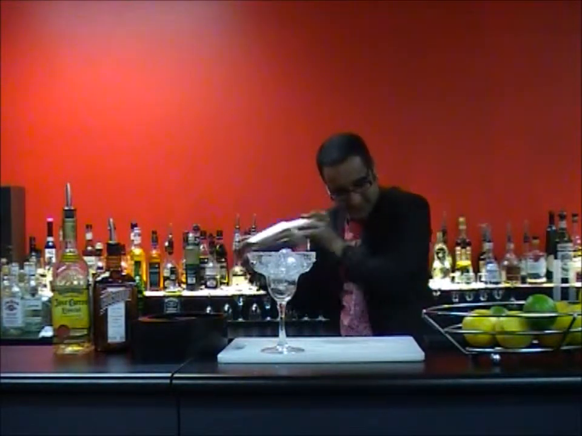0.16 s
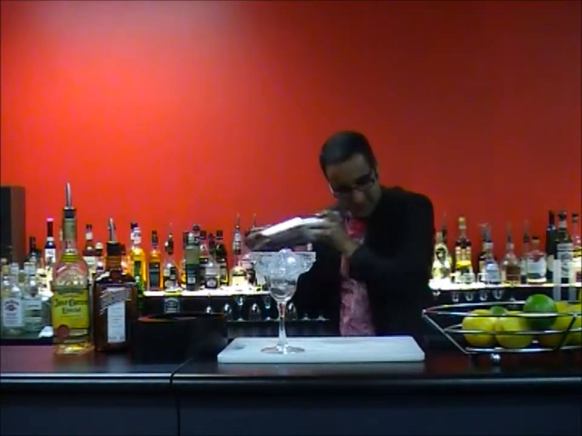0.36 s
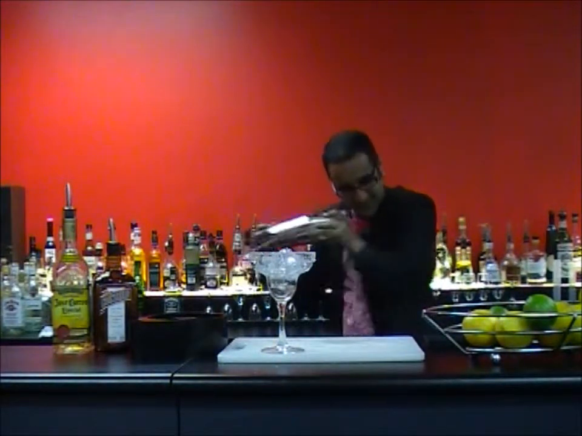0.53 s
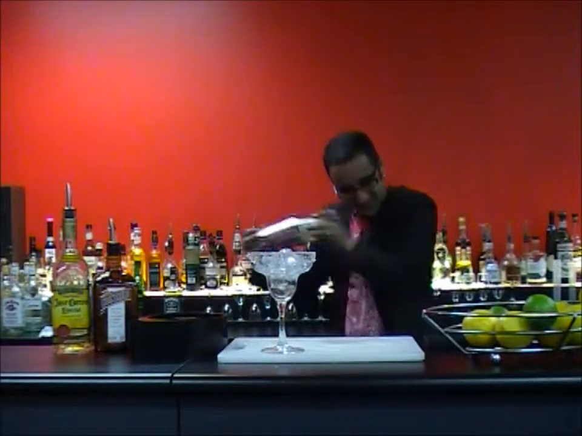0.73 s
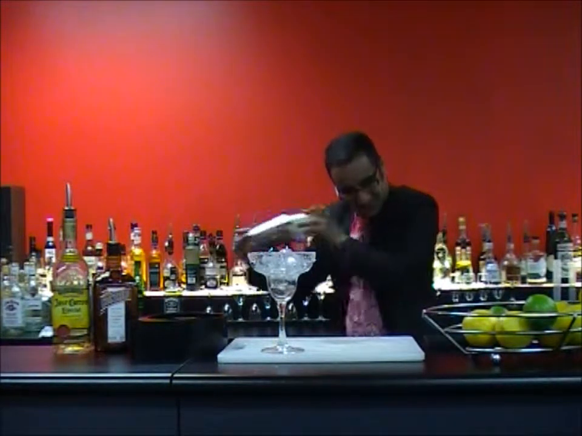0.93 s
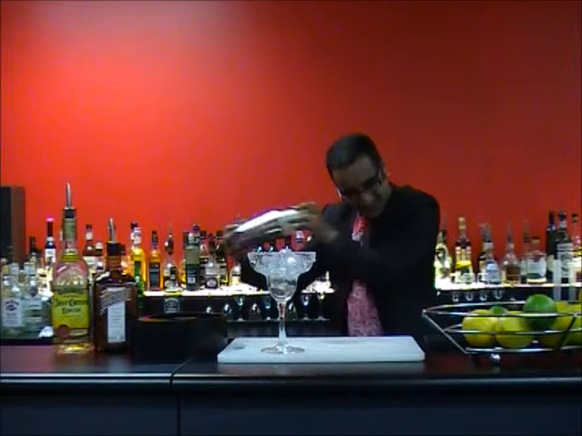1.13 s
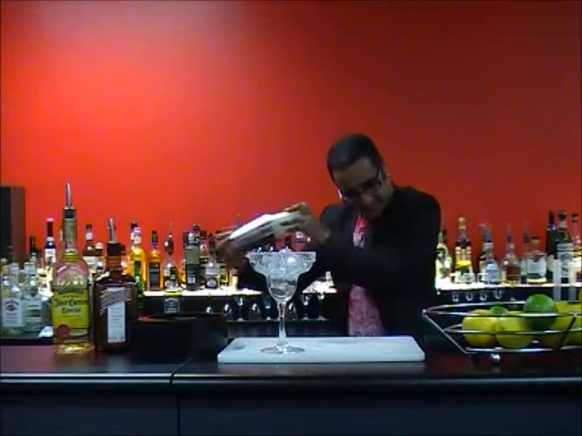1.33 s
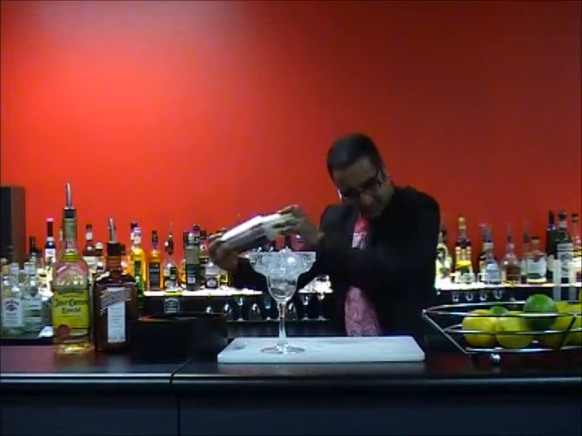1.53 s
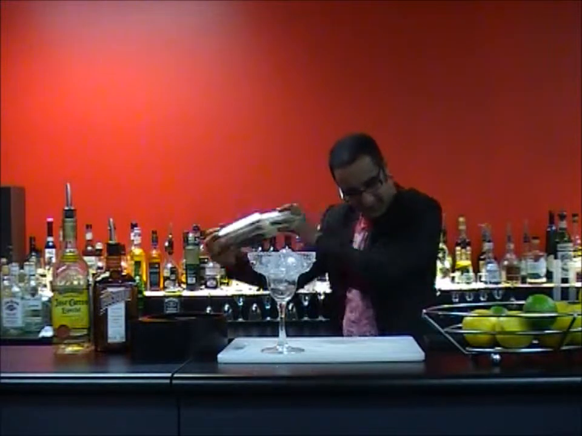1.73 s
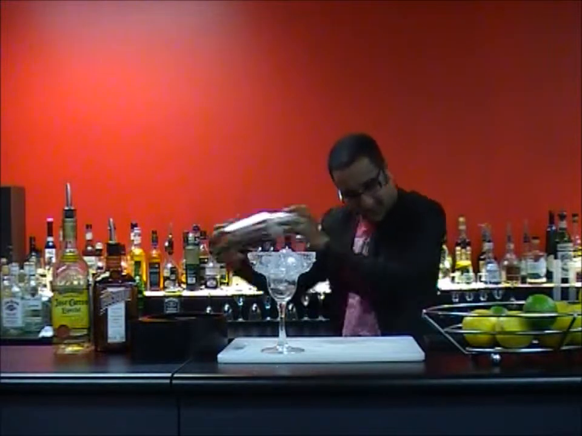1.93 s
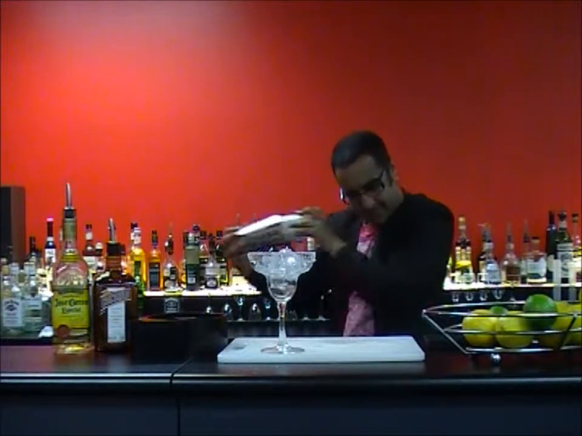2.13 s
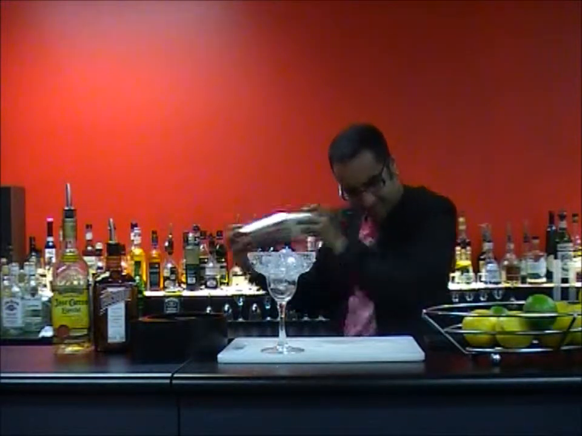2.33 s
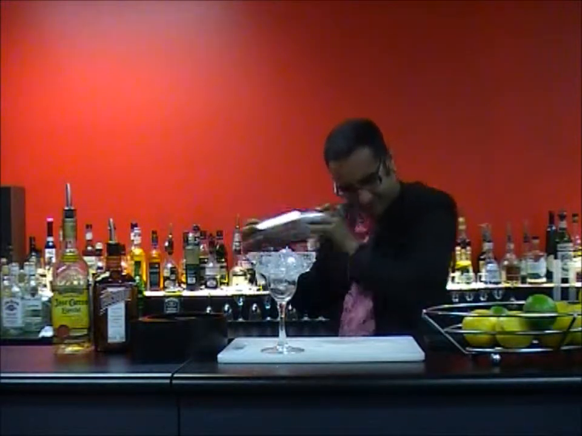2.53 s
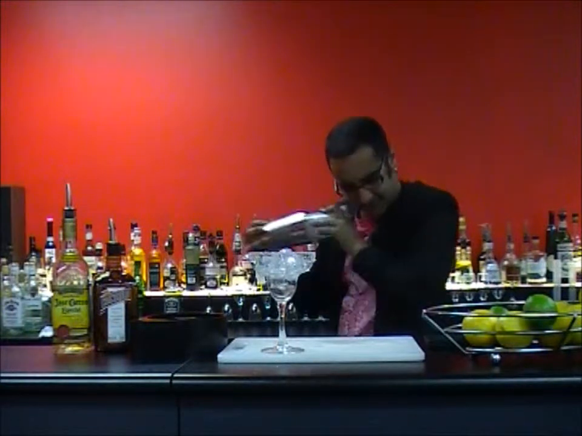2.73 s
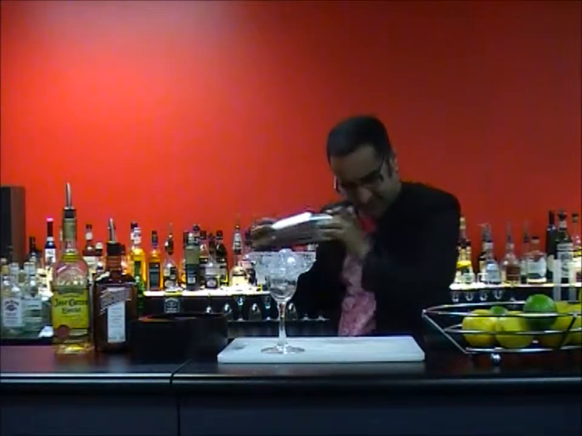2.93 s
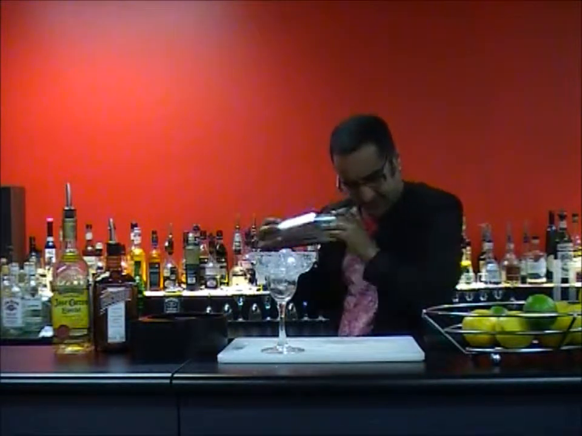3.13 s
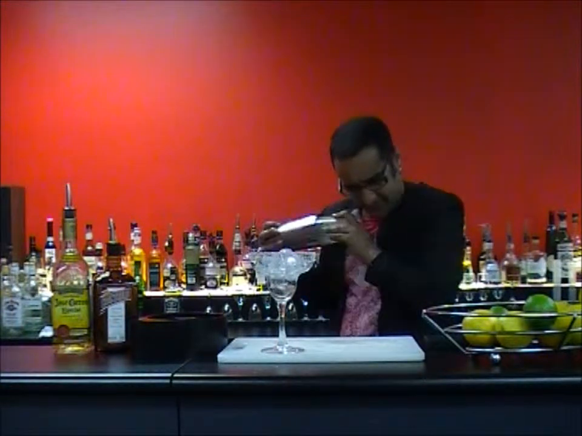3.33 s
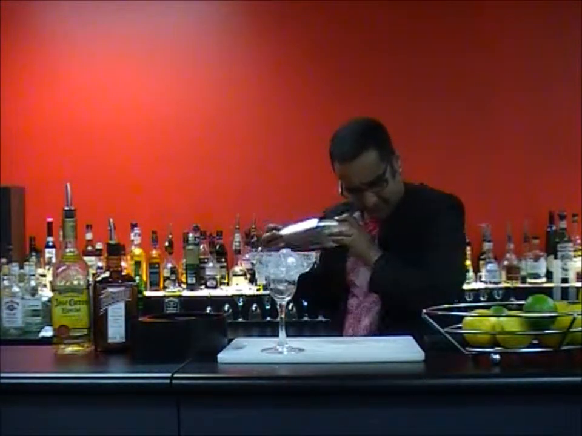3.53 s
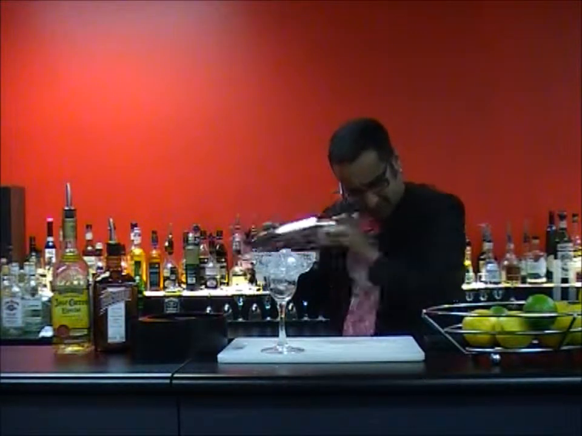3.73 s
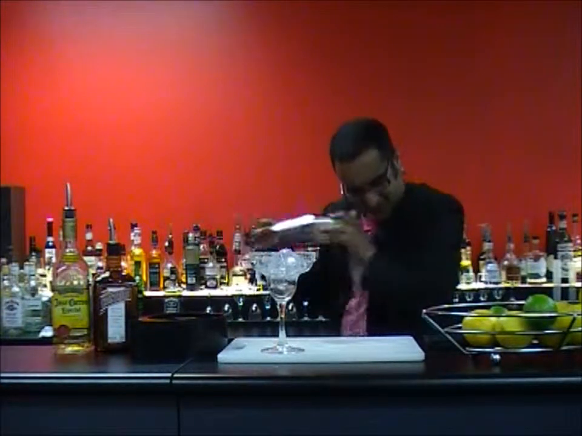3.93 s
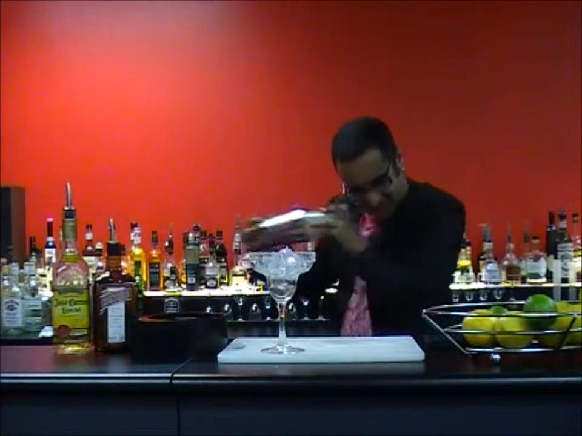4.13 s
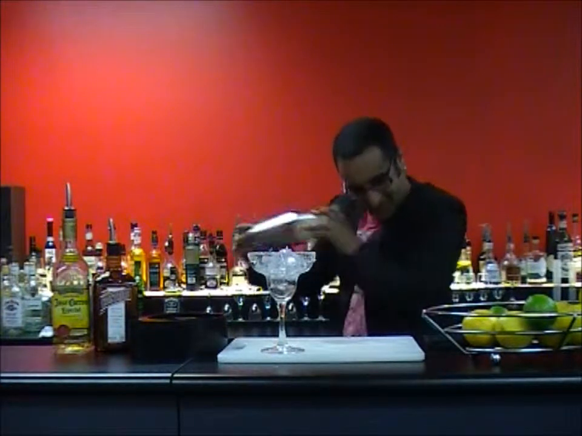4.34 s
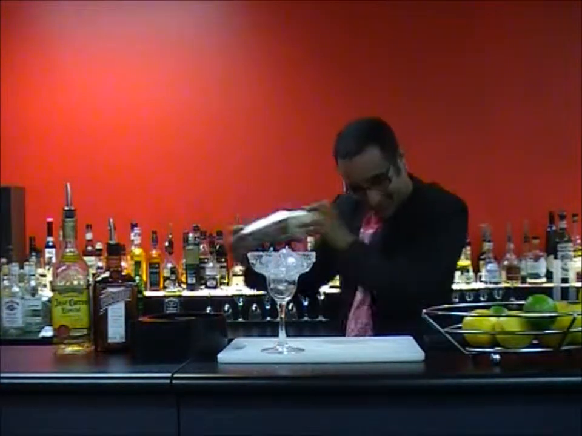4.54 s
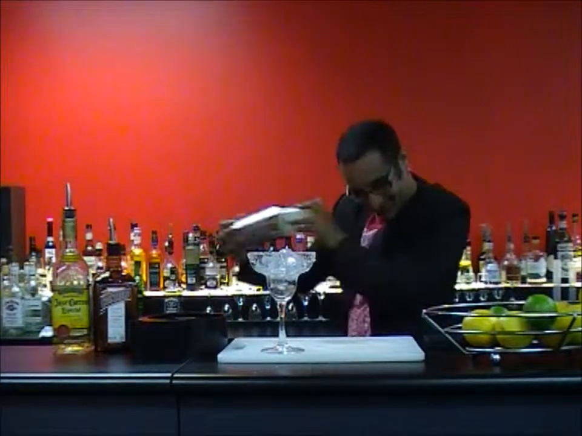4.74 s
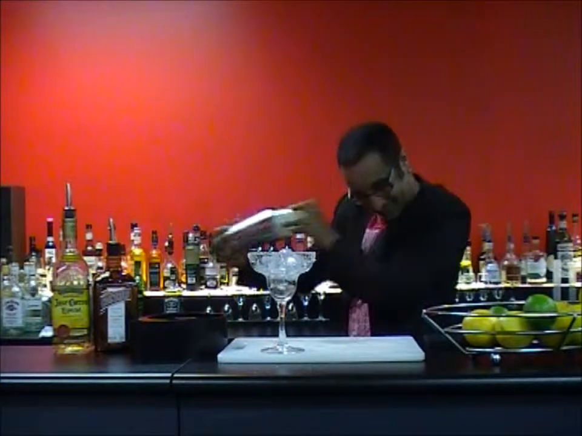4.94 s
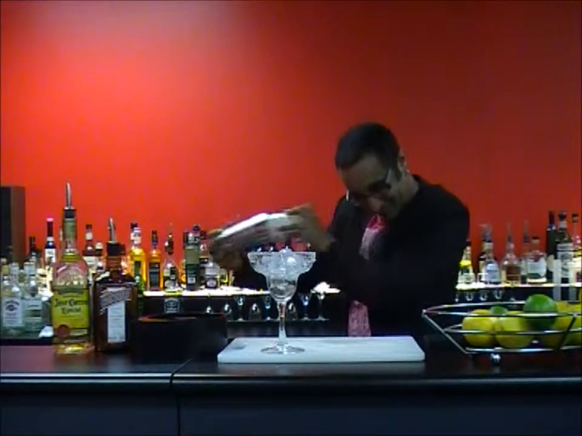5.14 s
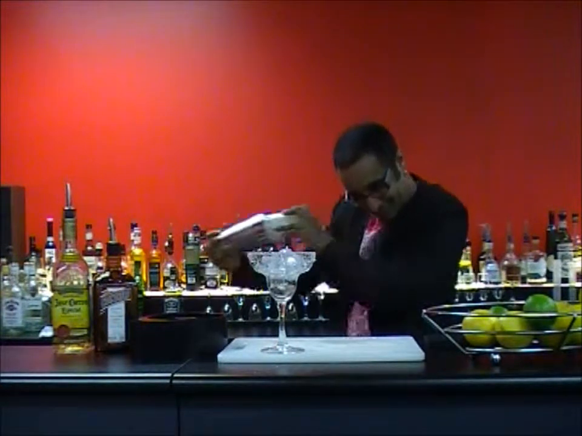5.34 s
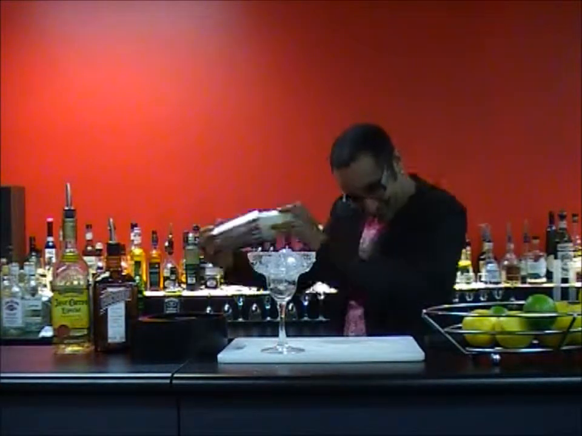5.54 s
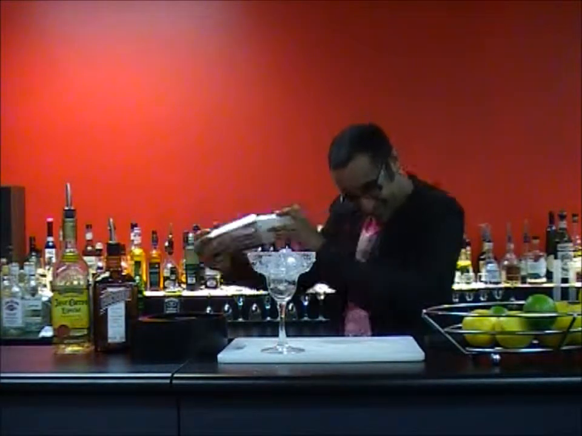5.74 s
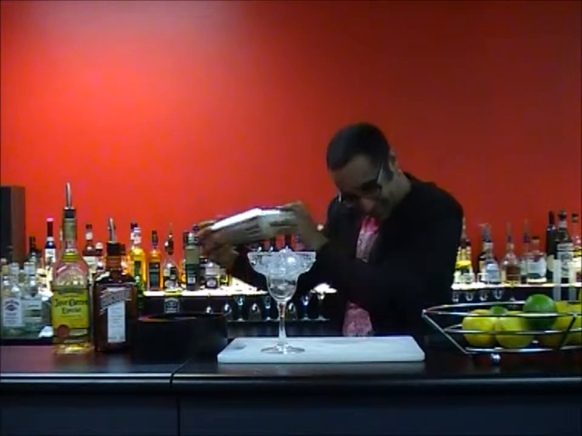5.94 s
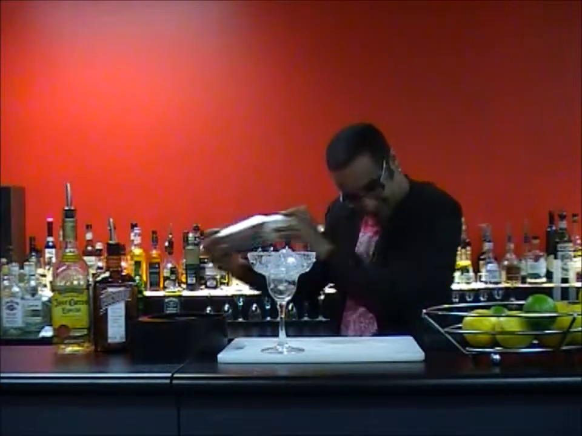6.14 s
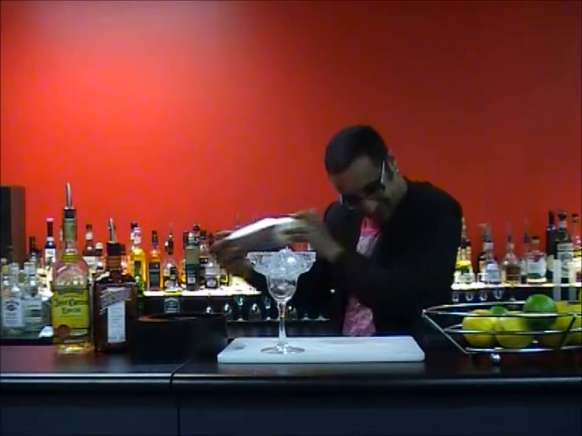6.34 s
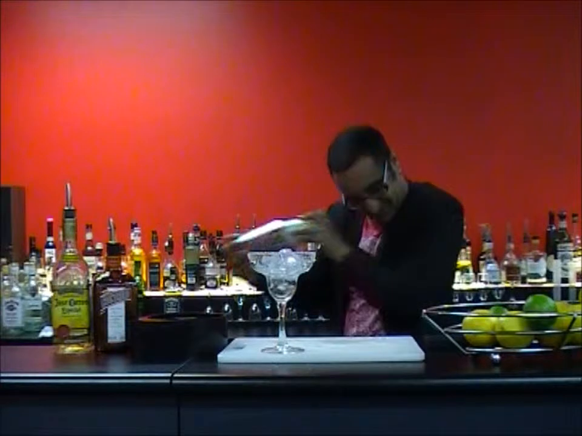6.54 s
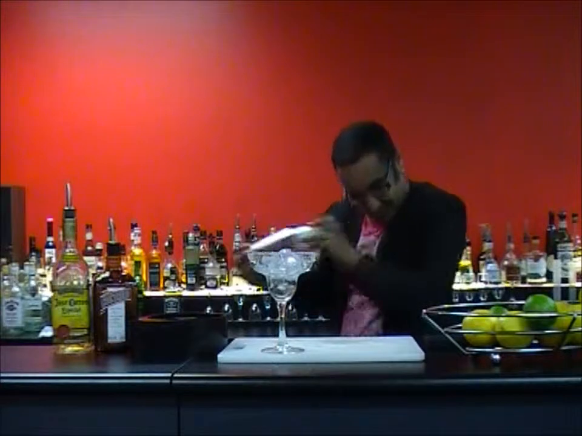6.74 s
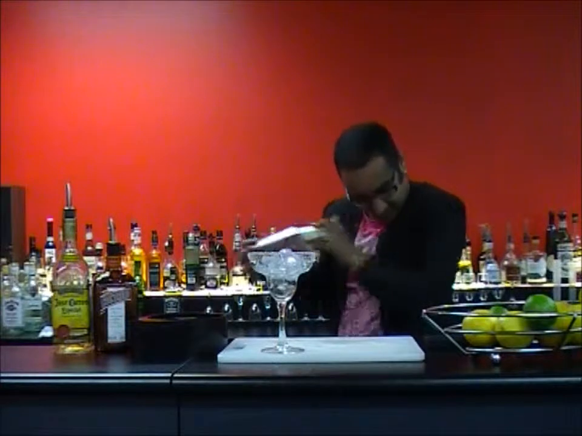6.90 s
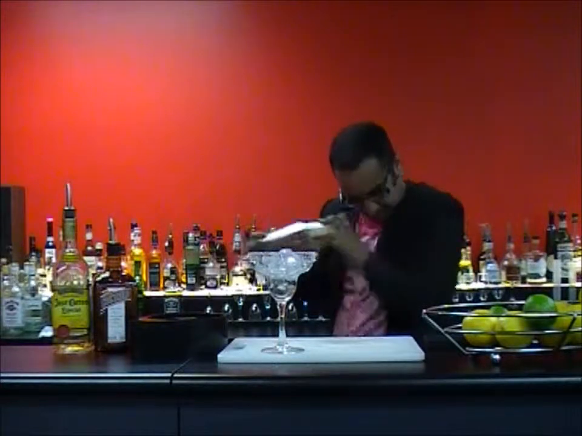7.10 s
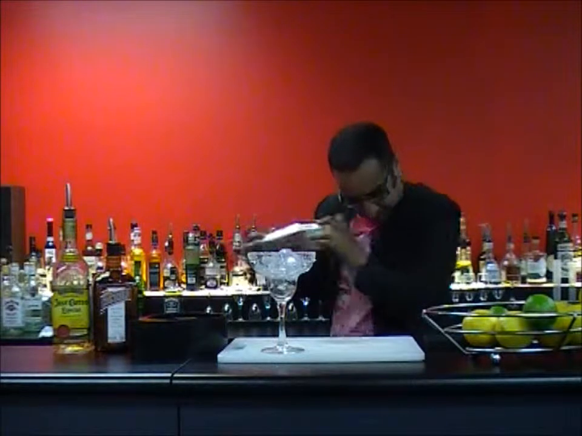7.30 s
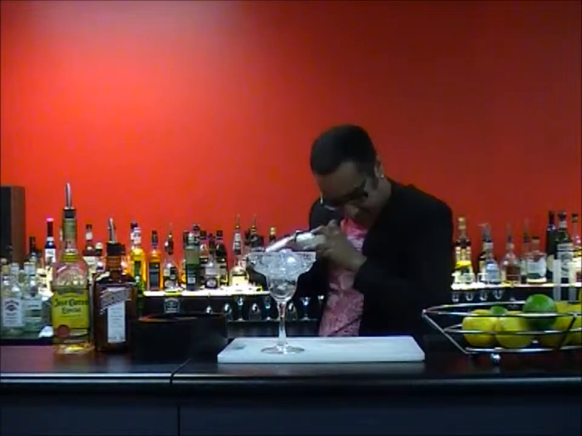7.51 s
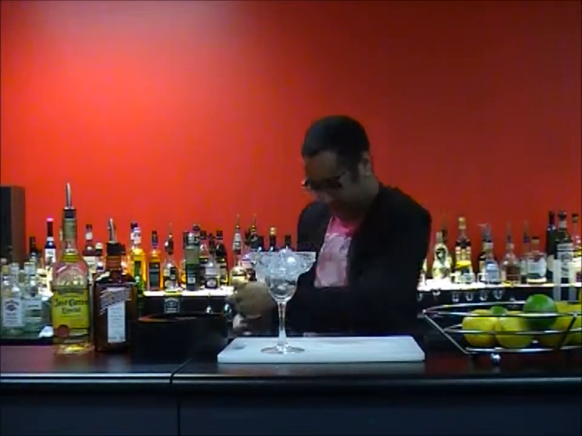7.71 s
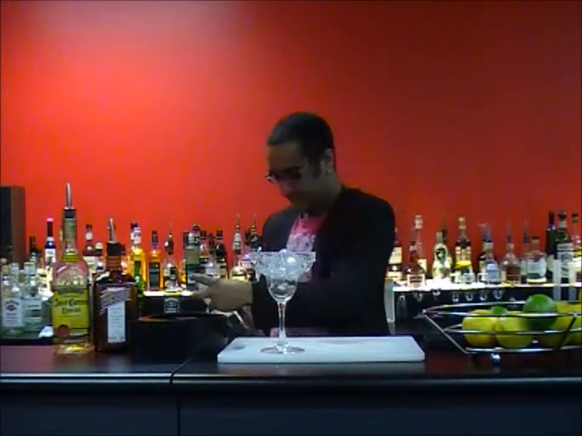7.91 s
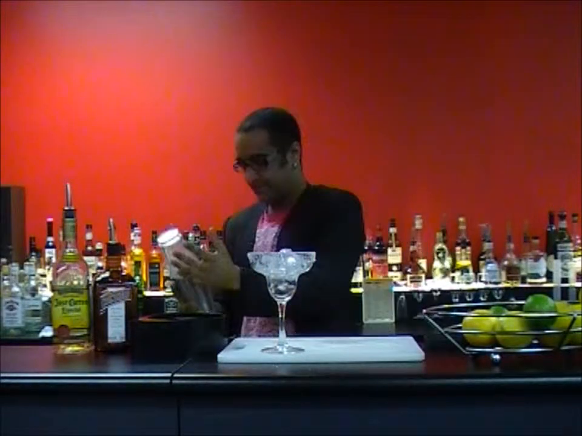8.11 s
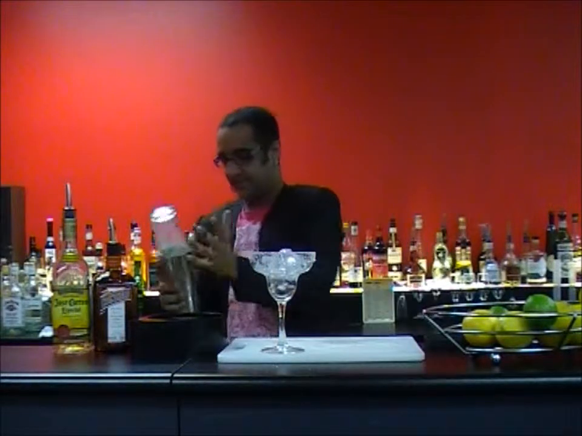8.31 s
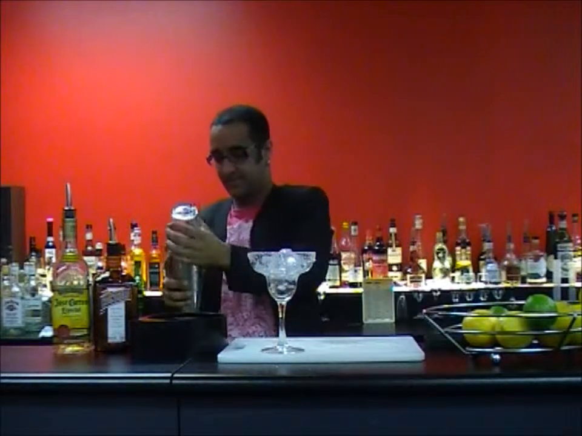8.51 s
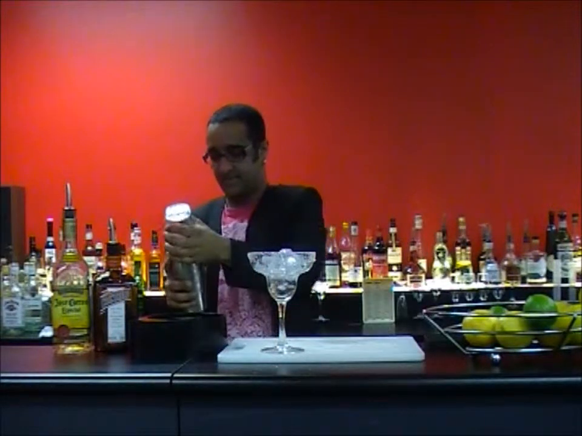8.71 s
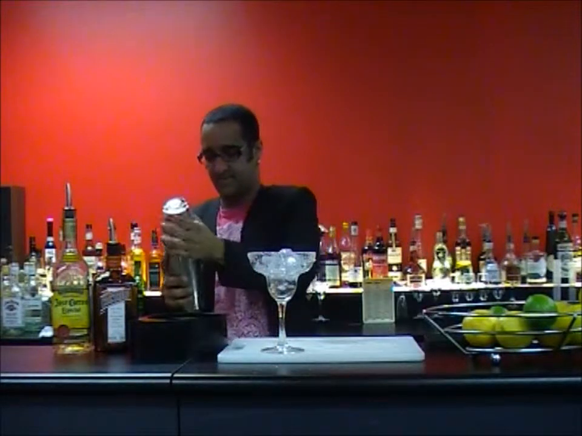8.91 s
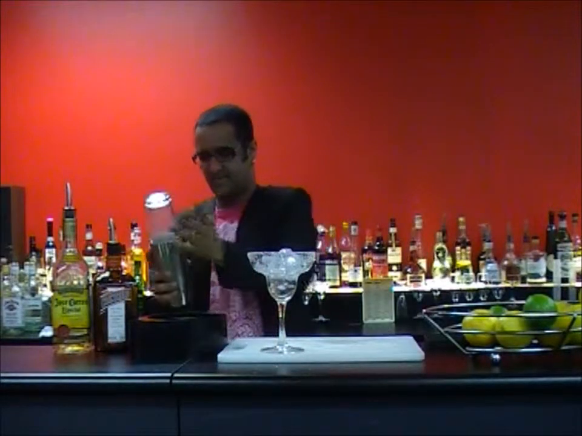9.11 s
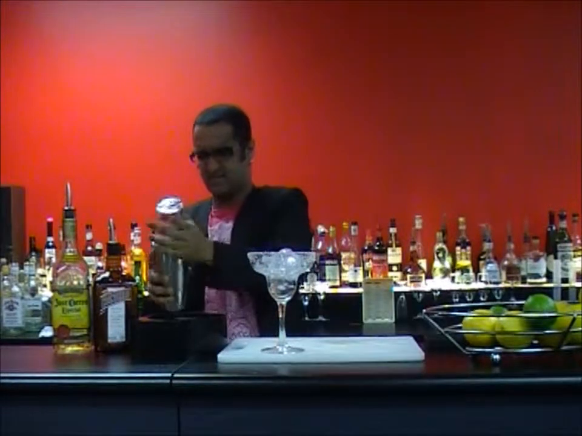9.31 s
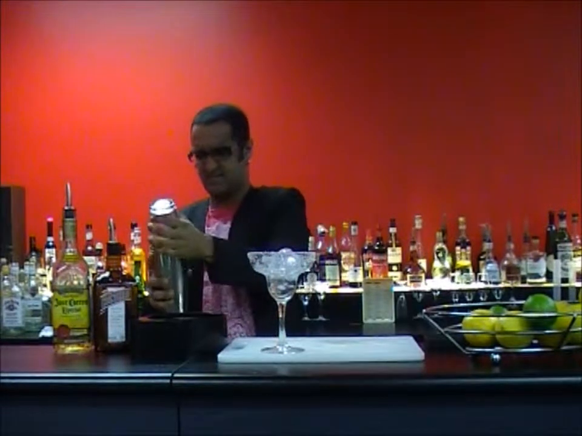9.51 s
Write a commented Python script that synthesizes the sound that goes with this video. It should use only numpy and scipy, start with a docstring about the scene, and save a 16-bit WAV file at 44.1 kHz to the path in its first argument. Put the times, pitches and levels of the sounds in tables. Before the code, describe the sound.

Ice slams back and forth in a metal cocktail shaker in fast, hard strokes, then stops for two light knocks over a faint hum.

```python
"""Ice tumbles in a steel shaker over a cooler's hum, then slams into the tin at the end of each stroke.
The shaker is shaken by hand a few steps from a camera in a bar, then stood up, knocked and twisted.
Random impacts excite damped wall modes; short wavelets make hard cracks and low modes make dull thuds.
Shaped noise and wavering tones form the cooler; sparse decaying echoes form the room.
The camera's gain control holds the hum down while the shaking lasts."""
import sys
import numpy as np
from scipy import signal
from scipy.fft import rfft, irfft, next_fast_len
from scipy.io import wavfile
from scipy.ndimage import uniform_filter1d

SR = 44100
rng = np.random.default_rng(int(sys.argv[2]) if len(sys.argv) > 2 else 0)


def bounce(signal):
    """Save signal as a 16-bit WAV file at the path given by the first command-line argument."""
    frames = np.transpose(np.atleast_2d(signal))
    limited = np.clip(frames, -1, 1)
    pcm = np.round(limited * 32767).astype(np.int16)
    wavfile.write(sys.argv[1], SR, pcm)


N = 421576

# ice tumbling and sliding along the wall: (time [s], level [dB], brightness [dB])
TUMBLING = [(0.0, -18, 2), (0.45, -16, -0.5), (1.41, -19, 1), (2.21, -15, 1), (2.85, -20, 0),
            (3.91, -20.5, 2), (4.07, -18.5, 0.5), (4.9, -17.5, 3), (5.59, -18.5, 2), (5.91, -14, 0.5),
            (6.12, -19.5, 3), (6.65, -17.5, 2), (7.08, -17.5, -1), (7.24, -21.5, 1), (7.43, -23.5, 3),
            (7.5, -15.5, 2), (7.67, -26, 0.5), (7.96, -38, 0), (8.08, -32, -0.5), (8.17, -54.5, -3),
            (9.56, -47, -5.5)]
# ice slamming as a stroke turns:
# (time [s], first blow [dB], crowd of cubes [dB], favoured ring [Hz], brightness [dB])
STROKE_SLAMS = [(0.0628, 13, -16, 1940, 2), (0.066, -1, -20, 3700, 3), (0.282, 10, -12.5, 1790, 0),
                (0.486, -1, -14.5, 3460, 10), (0.6946, 5, -18, 2080, 10), (0.715, 12, -16.5, 4430, -2),
                (0.925, -6, -14, 1870, 4), (1.124, -17, -17.5, 1910, 1), (1.1488, 11, -27, 2030, 9),
                (1.3596, -3, -13.5, 3430, 0.5), (1.5727, 14, -14, 3570, -1), (1.7594, -7, -18.5, 2700, 1),
                (1.7923, 7, -14.5, 2590, 3), (2.0086, 9, -20.5, 2400, 13), (2.212, -5, -15, 1680, 0),
                (2.427, 17, -17, 1960, 4), (2.632, 12, -13, 1840, 1.5), (2.846, 16, -20, 2850, 17),
                (2.857, 0, -26, 3000, 1), (3.0676, 18, -13.5, 2240, -2.5), (3.267, 2, -14.5, 2120, 3),
                (3.472, 7, -15.5, 3050, 6), (3.686, 4, -20, 1680, 7), (3.8798, 18, -23, 1760, -2),
                (3.899, 17, -12.5, 1960, 1), (4.089, 12, -15.5, 1770, 3), (4.117, 9, -15.5, 4000, 6.5),
                (4.3081, 13, -15.5, 1986, 4), (4.323, 9, -25, 1960, 5.5), (4.5123, -4, -35, 2030, 13),
                (4.5315, 18, -10.5, 2800, 3), (4.734, 7, -13.5, 3280, 7), (4.9394, 23, -13, 2020, -19),
                (4.9455, 13, -25, 3890, 1.5), (4.971, 14, -16.5, 3870, -8), (5.0, -2, -13, 3850, -3),
                (5.135, 0, -16.5, 3050, -11), (5.145, 26, -28, 2960, 4.5), (5.346, 0, -16.5, 1910, 3),
                (5.375, 5, -13.5, 2220, 0), (5.5335, 17, -30, 1760, 13), (5.5744, -21, -17.5, 1950, 6),
                (5.772, -6, -17.5, 1890, 7), (5.987, 21.5, -14, 1720, 6.5), (6.2124, 8, -12.5, 3360, 2),
                (6.3993, -1, -15.5, 1880, 4.5), (6.426, 21, -10, 2150, 1), (6.6029, -14, -15.5, 1880, 4),
                (6.6324, 18, -12.5, 3400, 3), (6.8134, -1, -33, 2770, 25), (6.842, 13, -13.5, 4400, -1),
                (7.027, 7, -17, 2000, 11), (7.1776, -6, -29, 2840, 20), (7.224, 17, -24, 1880, 4),
                (7.247, 18.5, -22, 2070, 4), (7.253, 2, -15, 2770, -2.5), (7.4415, 17, -20, 2950, 0),
                (7.457, 6, -19, 3080, 7)]
# ice bouncing back about 0.1 s after a slam, and sliding on when the shaking stops:
# (time [s], crowd [dB], favoured ring [Hz], brightness [dB])
ICE_REBOUNDS = [(.1, -18.5, 3700, -6), (.14, -21, 3840, 5), (.828, -26, 1940, 6), (1.242, -16, 2400, 1),
                (1.449, -27, 3500, 21), (1.623, -17.5, 2980, -5), (2.31, -14.5, 2100, 0),
                (2.539, -20.5, 1880, 11), (2.779, -24, 2870, 11), (2.949, -21, 4180, 3),
                (3.169, -22.5, 3340, 6), (3.352, -23, 1730, -3), (3.591, -21, 2010, 8),
                (3.97, -15, 1870, -2), (4.198, -22, 2860, 15), (4.428, -21.5, 4100, 10),
                (4.637, -21, 2000, -3), (4.822, -20, 3030, -1), (5.24, -15.5, 1980, -2),
                (5.299, -26, 1780, -3), (5.886, -20, 1740, 14), (6.088, -19, 2960, 6),
                (6.309, -21, 3780, -1), (6.508, -21, 1860, -2), (6.675, -16, 3870, 1),
                (6.766, -20, 1720, 10), (6.89, -16, 3600, 0), (6.94, -22, 7700, 8), (7.055, -17, 4050, 5),
                (7.14, -18, 1820, 6), (7.349, -20.5, 1700, 5), (7.899, -34, 3500, 3), (8.04, -39, 2800, 2)]
# standing shaker knocked and twisted, its ice shifting:
# (time [s], blow [dB], crowd [dB], favoured ring [Hz], brightness [dB])
STANDING_KNOCKS = [(8.381, -13, -27, 2400, -1), (8.398, -1, -32, 2380, -2), (8.584, -16, -40.5, 3200, 2.5),
                   (8.748, -32, -53.5, 7550, 20), (9.081, -36, -51, 4340, 12),
                   (9.232, -24, -35.5, 1640, -8), (9.248, -5, -37, 2450, 0.5), (9.288, -10, -39, 2940, 10),
                   (9.314, -12, -39, 3400, 4.5), (9.365, -14, -38, 1550, 4.5), (9.523, -28, -43.5, 4600, 8)]
# single cubes cracking hard: (time [s], knock [dB], knock pitch [Hz], bright edge [dB])
HARD_CRACKS = [(0.063, -2.5, 1970, -14), (0.0634, -1, 3700, -4.5), (0.07, -12, 3400, -16),
               (0.2835, -3, 1940, -4), (0.299, -2, 3080, -15), (0.4855, -6, 2000, -5),
               (0.5099, 3.5, 3940, -20), (0.5153, 5, 3400, -21), (0.6968, -6, 3400, -4),
               (0.7139, -9, 2500, -10), (0.7204, 1, 3480, -14), (0.9297, 2, 2200, -12),
               (0.936, 0.5, 2720, -17), (1.1491, -3.5, 2460, -1), (1.3694, -5, 3280, -11),
               (1.3766, -7, 3400, -19), (1.571, -11, 2900, -12), (1.5747, 4, 2000, -2),
               (2.0078, 0.5, 2330, -4), (2.0271, 1.5, 2140, -18), (2.223, -18, 1800, -4),
               (2.2301, -6, 4050, -13), (2.2999, -5, 2400, -18), (2.361, -9, 2800, -8),
               (2.4249, 0, 4000, -0.5), (2.429, 0, 2500, -8), (2.437, -4, 2700, -15), (2.651, 1, 2210, -16),
               (2.6566, 0, 2200, -14), (2.8497, 4.5, 2580, -5), (2.857, -1, 2900, -17),
               (2.8596, -8, 1800, 1), (3.0698, 1.5, 2060, -4), (3.0835, -15, 1900, -22),
               (3.282, 1, 2500, -11), (3.4712, -1, 2130, -15), (3.4766, -8, 2700, -14),
               (3.6873, -0.5, 2400, -15), (3.6939, 2, 4860, -19), (3.8987, -1, 1940, -18),
               (3.9165, -3, 2060, -18), (4.1209, -4, 3700, -8), (4.134, 0, 3400, -17),
               (4.309, -9, 2500, -25), (4.3235, 2, 2060, -18), (4.336, -10, 2200, -15),
               (4.513, -19, 2600, -4), (4.5285, -9, 3400, -14), (4.7317, -18, 1900, -3),
               (4.7391, -4, 3300, -4.5), (4.7562, -0.5, 2510, -11), (4.9391, 0.5, 2110, -8),
               (4.9457, -9, 3900, -15), (5.104, -2, 2250, -14), (5.1464, -4, 2800, -1.5),
               (5.1528, -3, 3400, -17), (5.363, -3, 2720, -15), (5.3788, 5, 2200, -2.5),
               (5.3874, -1, 2240, -24), (5.5317, -4, 3900, -10), (5.767, -17, 3600, -2.5),
               (5.7851, 1, 2030, -24), (5.9862, 1, 3220, -12), (5.9931, -8, 2180, -13),
               (6.2094, -6, 2500, -14), (6.2168, 2, 3840, -15), (6.3998, -11, 2200, -18),
               (6.427, 3, 2200, -8), (6.5109, -9, 2100, -15), (6.622, -8, 4300, -2),
               (6.628, -12, 2620, -12), (6.6352, 0, 4300, -14), (6.6375, -5, 4000, -21),
               (6.769, -12, 2300, -3.5), (6.7803, -4, 3400, -16), (6.815, -9, 3100, -3),
               (6.821, -7, 2500, -2), (6.8365, -1, 4300, -13), (6.843, 2, 4140, -24),
               (6.8495, 2, 4800, -20), (7.0273, -10, 2800, -3.5), (7.057, -2, 3300, -12),
               (7.181, -11, 3500, -2.5), (7.247, 4, 2100, -5), (7.251, -7, 2480, -4.5),
               (7.4428, 0, 2800, -9), (7.449, 0, 2680, -11), (7.4568, 0, 3080, -6),
               (8.3817, -24, 2800, -14.5), (8.5833, -27, 3600, -34), (8.7479, -33, 4200, -27),
               (9.2358, -20.5, 1500, -33), (9.258, -23, 2300, -22)]
# dull thuds of hand and counter: (time [s], level [dB], frequency [Hz], t60 [s])
DULL_THUDS = [(8.385, -29, 457, 0.069), (8.43, -42, 630, .2), (9.254, -38.5, 138, 0.23)]
# modes of a steel wall damped by hands and liquid: (frequency [Hz], level [dB], t60 [s])
TIN_MODES = [(832, -12.5, 0.02), (1380, -4, 0.006), (1656, -5.5, 0.014), (1880, -2, 0.032),
             (2100, 1, 0.0098), (2400, -5.5, 0.0089), (2770, 2, 0.0089), (3190, 2, 0.013),
             (3850, -0.5, 0.019), (4600, 0.5, 0.008), (5470, 0, 0.0071), (6480, 0.5, 0.0057),
             (7650, -1.5, 0.012), (8490, -3, 0.0081), (9800, -5.5, 0.0038), (11940, -25.5, 0.011)]
# radiation of a small tin, weak in the bass: (frequency [Hz], level [dB])
TIN_RADIATION = [(100, -66), (500, -4.5), (1000, -4), (9000, -2), (13000, -0.5), (16000, -38)]
# short contacts give no low knock: (frequency [Hz], level [dB])
BLOW_SPECTRUM = [(500, -63), (1400, -6.5), (4000, 1), (8000, -11.5), (14000, -7)]
# spectral balance of cracks: (frequency [Hz], level [dB])
CRACK_SPECTRUM = [(300, -49), (1200, -1.0), (11000, -0.5), (15000, -6)]
# relative spectral density of the room noise: (frequency [Hz], level [dB per Hz])
AIR_SPECTRUM = [(20, -30), (60, -5), (150, 2.5), (300, 11.5), (600, 8), (1000, 3.5), (1800, 2), (2500, -5),
                (5000, -12.5), (8000, -12.5), (11000, -25), (15000, -55)]
# motor tones: (frequency [Hz], level [dB], waver [Hz])
MOTOR_TONES = [(49.8, -66.5, 4.3), (97, -66, 2.5), (201.7, -59.5, 5.5), (325, -44.5, 14)]
# reverberation of the bar: (frequency [Hz], t60 [s])
BAR_DECAY = [(300, 1), (1500, 0.57), (4000, 0.49), (10000, 0.31)]
# scattered sound, opposite at the two ports: (frequency [Hz], level under the common sound [dB])
PORT_SCATTER = [(40, -21), (90, -8), (200, -13.5), (400, -14.5), (1400, -15.5), (3000, -11.5), (6000, -12),
                (9000, -5), (13000, -5.5)]
# stereo balance: (frequency [Hz], left minus right [dB])
PORT_BALANCE = [(40, 0), (100, 0.5), (300, 1), (1500, .5), (4000, 0.5), (8000, -1.5), (13000, 0)]

HITS_PER_S, SIZE_CAP = 2500, 2.6  # the cap limits an exponential draw
CLINK_SHARE, CLINK_DB, CLINK_T60_S = .03, 4.5, .0035
FAVOUR_DB, FAVOUR_WIDTH = 7.5, .13  # the width is in natural-log frequency
DETUNE = 0.071  # largest fraction by which grip and liquid pull a mode off pitch
TIGHT_DB = 19.5  # above this blow the crowd lands almost at once
SLAM_LEAD_S, SLAM_PEAK_S, SLAM_T60_S = 0.017, 0.011, 0.15
REBOUND_BLOW_DB = 9  # blow over its crowd
REBOUND_LEAD_S, REBOUND_RISE_S, REBOUND_T60_S = 0.018, 0.034, 0.19
KNOCK_LEAD_S, KNOCK_RISE_S, KNOCK_T60_S = 0.0013, 0.0078, 0.49
BLOW_RING_DB = -8.5  # how much the leading cube rings the tin
KNOCK_CYCLES, EDGE_RING_HZ, EDGE_CYCLES = 1.1, 8200, 2.3  # cycles per decay constant
AIR_DB, AIR_PATCH_DB = -42, 1.2
LIFT_S, LIFT_MOST_DB, DIP_S = 0.16, 4.5, 0.0065  # smoothing times, largest lift
LIMIT_DB, RECOVER_DB_PER_S = 4.5, 90
TREBLE_SENSE, UPPER_DIP = 3, .25  # the limiter hears treble most and dips the lows most
CEILING, EDGE_HZ = .97, 15700


def gain_of(db):
    """Level definition: 20 dB is a tenfold amplitude."""
    return 10 ** (np.asarray(db) / 20)


def evened(x):
    """Normalisation to unit root mean square."""
    return x / np.sqrt(np.mean(x ** 2) + 1e-20)


def read(points, hz):
    """Interpolation along logarithmic frequency."""
    f, value = np.transpose(points)
    return np.interp(np.log(hz + 1), np.log(f + 1), value)


def coloured(x, points):
    """Linear filtering: multiply the spectrum by a frequency response in dB."""
    size = next_fast_len(N + 4096)
    response = gain_of(read(points, np.fft.rfftfreq(size, 1 / SR)))
    return irfft(rfft(x, size) * response, size)[:N]


def ring(clicks, hz, t60):
    """Modal resonance: each click starts an exponentially dying sine of its own height."""
    r = np.exp(-np.log(1000) / (t60 * SR))
    turn = 2 * np.pi * hz / SR
    return signal.lfilter([0, np.sin(turn)], [1, -2 * r * np.cos(turn), r * r], clicks)


def tin(at, size, spot_hz, focus, bright_db, spread_db, reversed_share):
    """Modal excitation: the place of impact sets each mode's strength and detuning; focus favours one ring."""
    hz, db, t60 = np.transpose(TIN_MODES)
    near = np.exp(-.5 * (np.log(hz / spot_hz[:, None]) / FAVOUR_WIDTH) ** 2)
    treble = np.clip(np.log2(hz / 3500), 0, 1)
    draw = rng.random((len(at), len(TIN_MODES), 3))
    chance = np.sqrt(3) * (2 * draw[..., 0] - 1)  # unit variance
    favour_db = FAVOUR_DB * focus[:, None] * near
    weight = gain_of(db + favour_db + bright_db[:, None] * treble + spread_db * chance)
    weight *= np.sign(draw[..., 1] - reversed_share)
    mode_energy = np.sum(gain_of(2 * db) * t60) * SR / (4 * np.log(1000))
    weight *= size[:, None] / np.sqrt(mode_energy)
    # a focused hit tunes nearby modes towards its favoured ring; others detune at random
    towards_spot = np.clip(np.round(5 + 5 * (spot_hz[:, None] / hz - 1) / DETUNE), 0, 10)
    anywhere = 1100 * draw[..., 2] % 11
    focused = draw[..., 2] < focus[:, None] * near ** 2
    which = np.where(focused, towards_spot, anywhere).astype(int)
    out = np.zeros(N)
    for k in range(len(TIN_MODES)):
        for v, detune in enumerate(np.linspace(-1, 1, num=11)):
            clicks = np.bincount(at, weight[:, k] * (which[:, k] == v), N)
            out += ring(clicks, hz[k] * (1 + DETUNE * detune), t60[k])
    return coloured(out, TIN_RADIATION)


def landings():
    """Impact timing: harder slams tighten their crowd; rows add its lead, rise and t60 [s] in time order."""
    rows = []
    for row in STROKE_SLAMS:
        lead = SLAM_LEAD_S / (1 + gain_of(row[1] - TIGHT_DB) ** 2)
        rise = lead + SLAM_PEAK_S * lead / SLAM_LEAD_S * 0 + SLAM_PEAK_S - SLAM_PEAK_S + SLAM_PEAK_S
        rows.append((*row, lead, rise, SLAM_T60_S))
    for s, db, hz, bright in ICE_REBOUNDS:
        shape = REBOUND_LEAD_S, REBOUND_RISE_S, REBOUND_T60_S
        rows.append((s, db + REBOUND_BLOW_DB, db, hz, bright, *shape))
    rows += [(*row, KNOCK_LEAD_S, KNOCK_RISE_S, KNOCK_T60_S) for row in STANDING_KNOCKS]
    return np.transpose(sorted(rows))


def rattle():
    """Random impact process: many small hits and a few larger; each landing brings a crowd that thins out."""
    draw = rng.random((round(HITS_PER_S * N / SR), 4))
    t = draw[:, 0] * (N - 1) / SR
    s, db, tumble_bright = np.transpose(TUMBLING)
    tumble_power = gain_of(2 * np.interp(t, s, db))
    s0, _, crowd_db, spot_hz, bright, lead, rise, t60 = landings()
    age = t[:, None] - s0 + lead  # the first cubes arrive just ahead of the main blow
    decay_db = -60 * (age - rise).clip(0) / np.clip(t60, .02, 1)
    crowd = gain_of(2 * (crowd_db + decay_db)) * np.clip(age / rise.clip(.002), 0, 1)
    crowd_power = crowd.sum(1)
    power = tumble_power + crowd_power
    share = crowd_power / power
    last = np.clip(np.searchsorted(s0, t + 0.009) - 1, 0, None)  # a landing colours hits from 9 ms ahead
    bright_db = share * bright[last] + (1 - share) * np.interp(t, s, tumble_bright)
    bright_db += 5 * (2 * draw[:, 2] - 1)
    size = evened(gain_of(1.6 * np.minimum(-np.log(draw[:, 1] + 1e-9), SIZE_CAP)))
    size *= np.sqrt(power * SR / HITS_PER_S)
    at = (t * SR).astype(int)
    # a few cubes meet with a dry clink at one of three pitches
    clink = draw[:, 3] / CLINK_SHARE
    height = gain_of(CLINK_DB) * np.sqrt(power) * np.sign(draw[:, 1] - .5)
    clinks = np.zeros(N)
    for k, hz in enumerate((2300, 3300, 4400)):
        clicks = np.bincount(at, height * (np.floor(3 * clink) == k), N)
        clinks += ring(clicks, hz, CLINK_T60_S)
    hits = tin(at, size, spot_hz[last], share, bright_db, spread_db=4.5, reversed_share=.5)
    return coloured(clinks, TIN_RADIATION) + hits


def cooler():
    """Noise and tonal sources: broad room noise with drifting patches, and motor tones that waver."""
    frames, hz = N // 256 + 5, np.fft.rfftfreq(1024, 1 / SR)
    a, b, patches = rng.standard_normal((frames, 513, 3)).T
    patches = evened(uniform_filter1d(uniform_filter1d(patches, 10, 0), 14, 1))
    spectrum = gain_of(read(AIR_SPECTRUM, hz)[:, None] + AIR_PATCH_DB * patches)
    air = signal.istft((a + 1j * b) * spectrum, nperseg=1024, noverlap=768)[1]
    out, t = gain_of(AIR_DB) * evened(air[:N]), np.arange(N) / SR
    for f, db, waver in MOTOR_TONES:
        fuzz = evened(ring(rng.standard_normal(N), f, 1.25 / waver))
        tone = np.sqrt(2) * np.sin(2 * np.pi * (f * t + rng.random()))
        out = out + gain_of(db) * (tone + 0.48 * fuzz)
    return out


def blows():
    """Impulsive excitation: the leading cube of each landing starts all modes with the same sign."""
    s, db, _, spot_hz, bright = landings()[:5]
    at, size = (s * SR).astype(int), gain_of(db + BLOW_RING_DB)
    blow = tin(at, size, spot_hz, np.ones(len(s)), bright, spread_db=3.5, reversed_share=0)
    return coloured(blow, BLOW_SPECTRUM)


def cracks():
    """Brief contact: a knock of a cycle or two with a bright edge from cube on cube."""
    out, t = np.zeros(N + 400), np.arange(400) / SR
    for (s, db, hz, edge_db), draw in zip(HARD_CRACKS, rng.random((len(HARD_CRACKS), 2))):
        edge_hz = EDGE_RING_HZ * (0.947 + 0.24 * draw[0])
        for f, cycles, top_db in (hz, KNOCK_CYCLES, db), (edge_hz, EDGE_CYCLES, edge_db):
            u = t * f / cycles
            envelope = np.sqrt(2 * np.e * u) * np.exp(-u)  # peaks at 1
            wave = np.sin(2 * np.pi * (f * t + draw[1]))
            out[round(s * SR):][:400] += gain_of(top_db) * envelope * wave
    return coloured(out[:N], CRACK_SPECTRUM)


def thuds():
    """Low damped resonance: hand and counter each answer one impulse with a dying sine."""
    return sum(gain_of(db) * ring(np.arange(N) == round(s * SR), hz, t60) for s, db, hz, t60 in DULL_THUDS)


def bar(x):
    """Reverberation: random-sign taps die by band; echo sets cross-fade as the shaker moves."""
    out, turn = np.zeros(N), 2 * np.pi * 2.3 * np.arange(N) / SR
    for k in range(14):
        taps, at = np.zeros(SR), np.arange(200, SR - 20, 20)
        taps[at + rng.integers(0, 20, len(at))] = rng.choice([-1., 1.], len(at))
        hz, t, z = signal.stft(taps, SR, nperseg=256)
        decay = gain_of(-60 * t / read(BAR_DECAY, hz)[:, None])
        tail = signal.istft(z * decay, SR, nperseg=256)[1]
        # the squared windows sum to 1
        window = np.sqrt(1 / 7) * np.cos((1 + k % 7) * turn + k // 7 * np.pi / 2)
        out += signal.fftconvolve(x * window, tail / np.linalg.norm(tail))[:N]
    return out


def ports(x):
    """Scattering: two close ports share most sound; drifting scatter off the camera body differs."""
    hz, t, z = signal.stft(x, SR, nperseg=256)
    drift = rng.standard_normal((len(t), len(hz), 2)).T
    a, b = (evened(uniform_filter1d(uniform_filter1d(v, size=3, axis=0), size=6, axis=1)) for v in drift)
    scatter = signal.istft(z * (a + 1j * b) / np.sqrt(2), nperseg=256)[1][:N]
    side = coloured(scatter, PORT_SCATTER)
    half = np.array(PORT_BALANCE) * [1, .5]
    return np.array([coloured(x, half) + side, coloured(x, half * [1, -1]) - side])


def scene():
    """Superposition: direct shaker sound, its echoes and the cooler add at the two ports."""
    shaker = rattle() + blows() + cracks() + thuds()
    return ports(gain_of(-0.5) * shaker + gain_of(-5.5) * bar(shaker) + cooler())


def record(dry):
    """Dynamic compression: slow gain lifts quiet passages, a limiter dips after blows, peaks saturate."""
    power = (dry ** 2).mean(0)
    slow = np.exp(-1 / (LIFT_S * SR))
    mean_power = signal.lfilter([1 - slow], [1, -slow], power, zi=[power[:SR].mean()])[0]
    level_db = 10 * np.log10(mean_power + 1e-12)
    lift_db = np.clip(1.4 * (-19.0 - level_db), -3, LIFT_MOST_DB)

    quick = np.exp(-1 / (DIP_S * SR))
    treble = signal.sosfiltfilt(signal.butter(2, 5500, "high", fs=SR, output="sos"), dry)
    sensed = dry + TREBLE_SENSE * treble
    peak_db = 20 * np.log10(abs(sensed).max(0) + 1e-6) + lift_db
    fall = np.arange(N) * RECOVER_DB_PER_S / SR
    held_peak_db = np.maximum.accumulate(2 * (peak_db - LIMIT_DB) + fall) - fall  # overshoots twofold
    dip_db = signal.lfilter([1 - quick], [1, -quick], np.maximum(held_peak_db, 0))
    lows = signal.sosfiltfilt(signal.butter(2, 1400, fs=SR, output="sos"), dry)
    held = lows * gain_of(lift_db - dip_db) + (dry - lows) * gain_of(lift_db - UPPER_DIP * dip_db)

    # overload is lopsided and leaves a low thump
    excess = np.clip(abs(sensed) * gain_of(lift_db) - 1.25, 0, .6)
    thump = signal.sosfilt(signal.butter(2, [20, 220], "band", fs=SR, output="sos"), excess)
    held = held + 0.41 * thump
    held = held / (1 + (held / CEILING) ** 10) ** (1 / 10)
    low_pass = signal.firwin(511, EDGE_HZ, window=("kaiser", 9), fs=SR)
    return signal.oaconvolve(held, low_pass[None], "same")


dry = scene()
out = record(dry)
bounce(out)
```